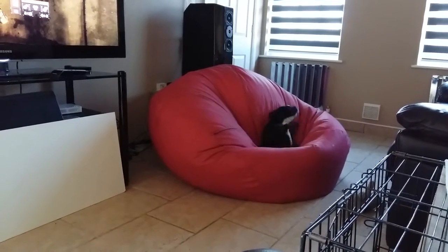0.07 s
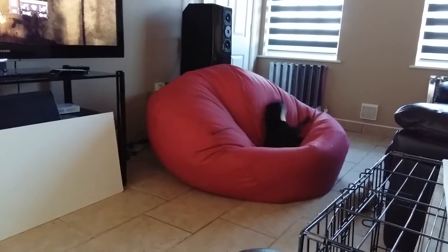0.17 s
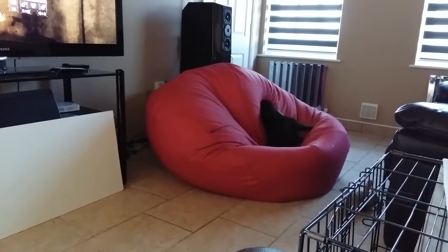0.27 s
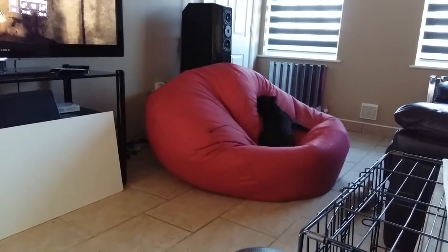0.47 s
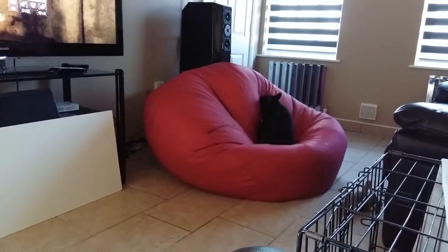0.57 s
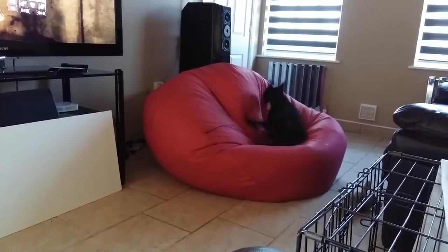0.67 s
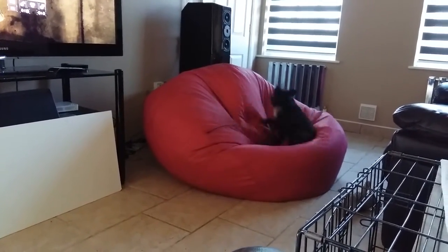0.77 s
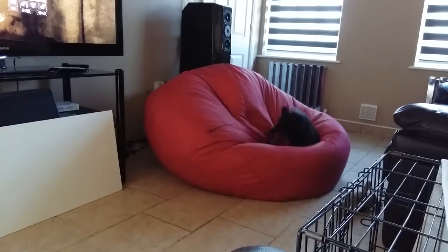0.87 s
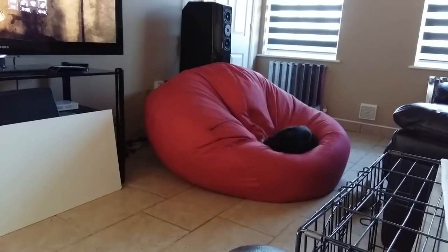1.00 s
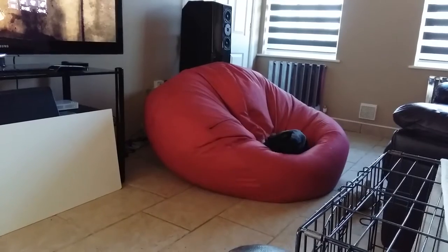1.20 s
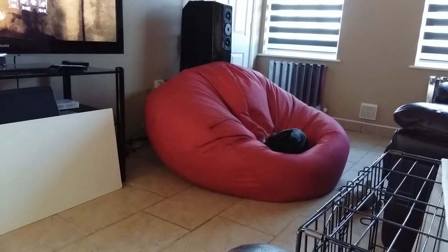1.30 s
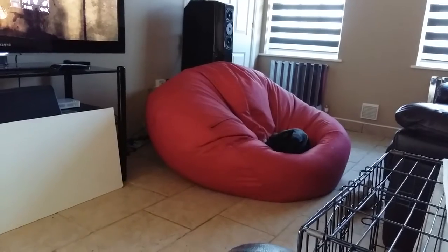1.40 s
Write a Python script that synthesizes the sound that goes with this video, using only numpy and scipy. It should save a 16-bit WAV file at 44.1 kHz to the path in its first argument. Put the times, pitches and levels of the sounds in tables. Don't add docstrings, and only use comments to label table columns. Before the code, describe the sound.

A cat scrambles in a bead-filled beanbag, with loud paw thumps and swishing, rustling beads

```python
import sys
import numpy as np
from scipy import signal
from scipy.fft import rfft, irfft, next_fast_len
from scipy.io import wavfile
from scipy.ndimage import uniform_filter1d, map_coordinates

SR = 44100
rng = np.random.default_rng(int(sys.argv[2]) if len(sys.argv) > 2 else 0)


def bounce(signal):
    frames = np.transpose(np.atleast_2d(signal))
    limited = np.clip(frames, -1, 1)
    pcm = np.round(limited * 32767).astype(np.int16)
    wavfile.write(sys.argv[1], SR, pcm)


def convert_level_to_amplitude(level_db):
    exponent = np.asarray(level_db, float) / 20
    return 10 ** exponent


N = 63945


def unit(x):
    return x / np.sqrt(np.mean(x ** 2) + 1e-20)


def along(points, hz):
    f, v = np.transpose(points)
    return np.interp(np.log(hz + 1), np.log(f + 1), v)


def wobble(rate):
    return map_coordinates(rng.standard_normal(int(N * rate / SR) + 4), [np.arange(N) * rate / SR])


def filtered(x, response):
    m = next_fast_len(N + 8192)
    return irfft(rfft(x, m) * response(np.fft.rfftfreq(m, 1 / SR)), m)[..., :N]


def varied(x, db_of):
    hz, t, z = signal.stft(x, SR, nperseg=512)
    return signal.istft(z * convert_level_to_amplitude(db_of(hz[:, None], t)), SR, nperseg=512)[1][..., :N]


# frequency in Hz, level in dB per Hz.
AIR_COLOUR = [(30, 5.5), (100, -5), (250, -3.5), (450, -17.5), (700, -8), (2400, -12), (6000, -38.5),
              (15800, -53)]
AIR_DB, HUM_HZ, HUM_DB = -42, 97.8, -50.5


def quiet():
    noise = rng.standard_normal((2, N))
    air = unit(filtered(noise, lambda hz: convert_level_to_amplitude(along(AIR_COLOUR, hz))))
    hum_cycles = np.cumsum(HUM_HZ + 0.68 * wobble(9.5)) / SR
    hum = np.sin(2 * np.pi * hum_cycles) * convert_level_to_amplitude(HUM_DB + 3.0 * wobble(10.2))
    return convert_level_to_amplitude(AIR_DB) * air + hum * [[1], [0]]


# time in seconds, bead flow in dB, brightness in dB, weight on the bag in dB.
PUSHING = [(0, -52, 11.5, 6), (.17, -50, 5, 11.5), (.2, -41.5, 6.5, 2.5), (0.237, -29, -2, 5),
           (.265, -31, 4.5, 5.5), (0.328, -35, 3, 1.5), (0.408, -32, 1, 3), (.535, -33.5, 1.5, 3),
           (.585, -31, 4.5, 6), (.635, -26, 2, 5.5), (.715, -32, 3, 6.5), (.81, -31.5, 3, -1),
           (0.858, -33, 5, 5), (.95, -32, 3.5, 3), (1.02, -29.5, 3, -4), (1.068, -27.5, 3, 5.5),
           (1.2, -46.5, 2.5, -4), (1.45, -58, 11, 12)]


def effort(t):
    s, *columns = np.transpose(PUSHING)
    return [np.interp(t, s, column) for column in columns]


# frequency in Hz, level in dB per Hz.
BEAD_COLOUR = [(250, -3.5), (420, -4.5), (750, 3), (2100, 1.6), (3500, -8), (6000, -14), (10000, -23),
               (15800, -27)]
# frequency in Hz, share of the brightness (no unit).
BRIGHTNESS_SHARE = [(900, -0.68), (2200, -0.079), (5000, 1.44), (12000, 0.68)]
BEADS_PER_S, BEAD_SCATTER_DB, PATCHY_DB, FLUTTER_DB = 15000, 1.2, 1, .6


def beads():
    chance, size = rng.random((2, 2, N))
    strength = convert_level_to_amplitude(-BEAD_SCATTER_DB * np.log(size + 1e-4))
    ticks = (chance < BEADS_PER_S / SR) * strength * rng.standard_normal((2, N))
    swish = unit(filtered(ticks, lambda hz: convert_level_to_amplitude(along(BEAD_COLOUR, hz))))
    patches = uniform_filter1d(rng.standard_normal((257, N // 256 + 2)), 6, 0)
    patches = unit(uniform_filter1d(patches, 10, 1))

    def colour_db(hz, t):
        return along(BRIGHTNESS_SHARE, hz) * effort(t)[1] + PATCHY_DB * patches[:, :len(t)]

    flow_db = effort(np.arange(N) / SR)[0]
    return varied(swish, colour_db) * convert_level_to_amplitude(flow_db + FLUTTER_DB * wobble(30.66))


# frequency in Hz, width in Hz, level in dB.
BODY_RESONANCES = [(72.5, 28, -4), (159.8, 23, -2.3), (202, 18.6, -3), (253.6, 37, -6), (353, 98, -10),
                   (454, 145, -20)]
GRUMBLE_DB, GRUMBLE_LUMPS_DB = -9, 1


def grumble():
    flow_db, _, weight_db = effort(np.arange(N) / SR)
    push = rng.standard_normal((2, N)) * convert_level_to_amplitude(GRUMBLE_LUMPS_DB * wobble(33.76))

    def body(f):
        total = 0
        for k, (centre, width, db) in enumerate(BODY_RESONANCES):
            resonance = 1j * f * width / (centre ** 2 - f * f + 1j * f * width)
            total = total + (-1) ** k * convert_level_to_amplitude(db) * resonance
        return total

    return unit(filtered(push, body)) * convert_level_to_amplitude(flow_db + weight_db + GRUMBLE_DB)


# start in seconds, peak level in dB, pitch in Hz, time to fall 60 dB in seconds.
PAW_THUMPS = [(.2, -30, 231, .07), (.2392, -5, 215, .075), (.2555, -14, 245, .14), (.281, -20, 175, .11),
              (.312, -22, 215, .1), (.36, -32, 240, .1), (.41, -29, 165, .15), (.541, -22, 165, .18),
              (.591, -26, 165, .1), (.611, -28, 250, .08), (.627, -10, 165, .13), (.642, -21, 300, .05),
              (.663, -17, 175, .08), (.712, -28, 240, .07), (.735, -28, 165, .15), (.785, -34, 80, .25),
              (1.015, -28, 205, .1), (1.06, -21, 270, .15), (1.12, -29, 315, .1), (.25, -32, 78, .2),
              (.57, -37, 76, .2), (.545, -31, 290, .08)]
# multiple of the pitch (no unit), level in dB.
THUMP_PARTIALS = [(.7, -11), (1, 0), (1.5, -14), (2.2, -20), (3.5, -21)]
ATTACK_CYCLES, SAG_PER_S = 1, 3.5


def thumps():
    out, t = np.zeros(N + SR), np.arange(SR // 3) / SR
    scatter_db = rng.standard_normal((len(PAW_THUMPS), len(THUMP_PARTIALS)))
    for (s, db, hz, t60), row in zip(PAW_THUMPS, scatter_db):
        cycles = hz * (1 - np.exp(-SAG_PER_S * t)) / SAG_PER_S
        boom = 0
        for (ratio, level), extra in zip(THUMP_PARTIALS, row):
            boom = boom + convert_level_to_amplitude(level + extra - 60 * t / t60) * np.sin(2 * np.pi * ratio * cycles)
        attack = 1 - np.exp(-t * hz / ATTACK_CYCLES)
        out[round(s * SR):][:len(t)] -= convert_level_to_amplitude(db) * boom * attack
    return out[:N]


# start in seconds, length in seconds, centre in Hz, level in dB.
FABRIC_DRAGS = [
    (0.399, .13, 1850, -31),
    (0.762, 0.066, 1940, -39.5),
    (0.217, 0.077, 3600, -34.5),
    (0.59, 0.042, 4500, -49),
    (0.962, 0.081, 920, -41),
    (1.104, 0.17, 830, -41.5),
    (1.322, 0.054, 1970, -49),
]
DRAG_Q, DRAG_RISE = 1, .2


def drags():
    out, t = np.zeros((2, N)), np.arange(N) / SR
    for s, length, hz, db in FABRIC_DRAGS:
        def fold(f):
            damping = 1j * f * hz / DRAG_Q
            return (damping / (hz * hz - f * f + damping)) ** 2

        u = (t - s) / length
        stroke = np.clip(np.minimum(u / DRAG_RISE, (1 - u) / (1 - DRAG_RISE)), 0, 1) ** .5
        out += convert_level_to_amplitude(db) * stroke * unit(filtered(rng.standard_normal((2, N)), fold))
    return out


# start in seconds, length in seconds, first pitch in Hz, last pitch in Hz,
# level in dB.
CLAW_ZIPS = [
    (.2195, .0105, 1500, 4500, -28),
    (1.132, .0035, 800, 1700, -25),
    (1.337, .006, 1900, 2200, -41),
    (1.154, .01, 1600, 1750, -33),
]


def claws():
    out = np.zeros(N)
    for s, length, from_hz, to_hz, db in CLAW_ZIPS:
        u = np.linspace(0, 1, round(length * SR))
        cycles = np.cumsum(from_hz * (to_hz / from_hz) ** u) / SR
        rough = 1 + 1.8 * uniform_filter1d(rng.standard_normal(2000), 12)[:len(u)]
        swell = convert_level_to_amplitude(db) * np.sin(np.pi * u) ** .5
        out[round(s * SR):][:len(u)] = swell * rough * np.sin(2 * np.pi * cycles)
    return out


# frequency in Hz, time to fall 60 dB in seconds.
ROOM_DECAY = [(100, 0.62), (1000, 0.54), (5000, 0.82), (14000, 0.45)]


def room(x):
    hz, t, z = signal.stft(rng.standard_normal((2, SR // 2)), SR, nperseg=256)
    decay = convert_level_to_amplitude(-60 * t / along(ROOM_DECAY, hz)[:, None])
    tail = signal.istft(z * decay, SR, nperseg=256)[1]
    tail = tail / np.linalg.norm(tail[0])
    late = np.pad(x, ((0, 0), (300, 0)))
    return signal.fftconvolve(late, tail, axes=1)[:, :N]


def moving_room(x, count=12):
    place = np.linspace(0, count - 1, N)
    return sum(room(x * np.clip(1 - abs(place - k), 0, 1) ** .5) for k in range(count))


# frequency in Hz, left-right likeness from 0 to 1.
LIKENESS = [(60, .975), (200, 0.91), (400, 0.79), (750, 0.58), (1300, 0.048), (15000, .01)]


def spread(pair):
    def mid_side(hz):
        turn = np.arccos(np.clip(along(LIKENESS, hz), -1, 1)) / 2
        return np.array([np.cos(turn), np.sin(turn)])

    mid, side = filtered(pair, mid_side)
    return np.array([mid + side, mid - side])


WET_DB, THUMP_WET_DB = -4, -14


def scene():
    rustle = beads() + grumble() + drags()
    knocks = np.array([thumps() + claws(), 0.17 * claws()])
    rustle_room = convert_level_to_amplitude(WET_DB) * moving_room(rustle)
    knock_room = convert_level_to_amplitude(THUMP_WET_DB) * moving_room(knocks[[0, 0]])
    return spread(rustle + rustle_room + knocks + knock_room + quiet())


def roll_off(x):
    return signal.sosfilt(signal.butter(12, 15930, fs=SR, output="sos"), x)


# frequency in Hz, left minus right in dB.
PORT_LEAN = [(60, 2.5), (300, -.3), (900, -0.8), (1500, -0.5), (2800, -7), (5000, 2.5), (9000, 7.5),
             (14000, 2)]
# frequency in Hz, level in dB.
MIC_COLOUR = [(3000, 1.01), (4300, 2), (5000, -4), (6500, -1), (7600, -6), (11000, -8.5), (15000, -10.5)]
LOW_CUT_HZ, TOP_HZ = 50, 15850
HISS_DB, HISS_FROM_HZ = -68.5, 4600
FADE_S, FADE_DB_PER_S = 1.243, -33


def record(dry):
    def ports(hz):
        lean = convert_level_to_amplitude(along(PORT_LEAN, hz) * np.array([[.5], [-.5]]))
        low_cut = (1j * hz / (LOW_CUT_HZ + 1j * hz)) ** 4
        return lean * low_cut * convert_level_to_amplitude(along(MIC_COLOUR, hz)) * (hz < TOP_HZ)

    def hiss_colour(hz):
        return hz / (HISS_FROM_HZ + hz) * (hz < TOP_HZ)

    hiss = convert_level_to_amplitude(HISS_DB) * filtered(rng.standard_normal((2, N)), hiss_colour)
    fade = convert_level_to_amplitude(FADE_DB_PER_S * np.clip(np.arange(N) / SR - FADE_S, 0, None))
    return roll_off((filtered(dry, ports) + hiss) * fade)


dry = scene()
out = record(dry)
bounce(out)
```